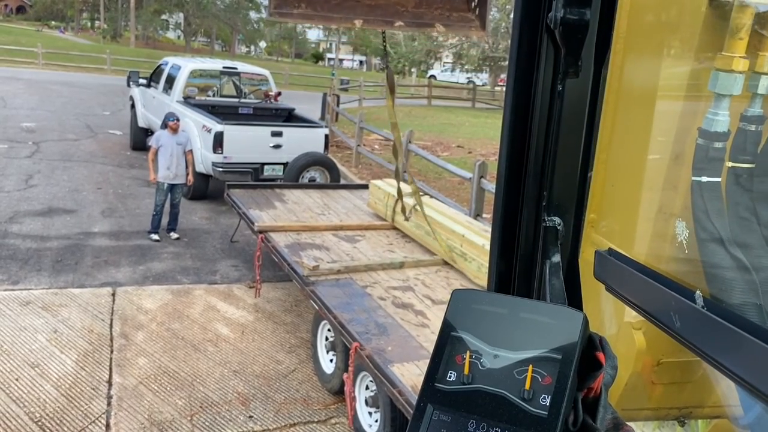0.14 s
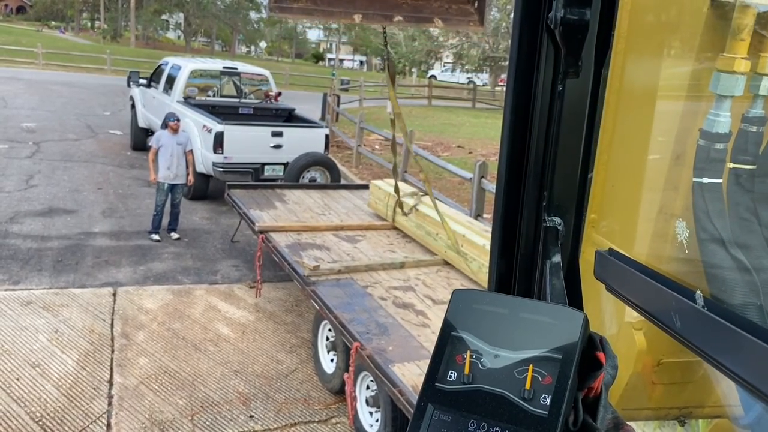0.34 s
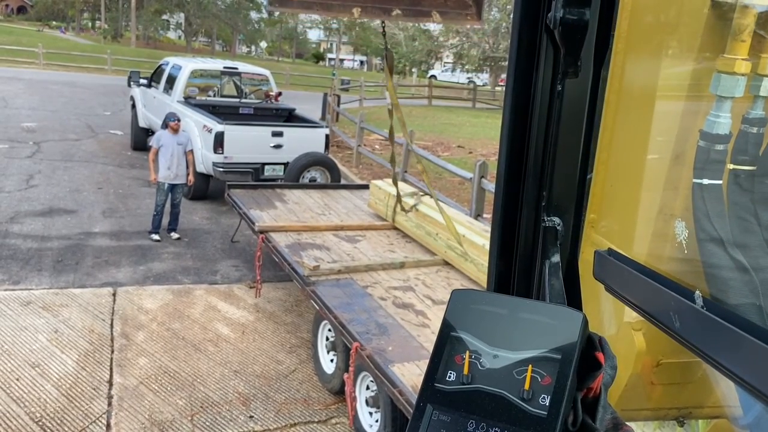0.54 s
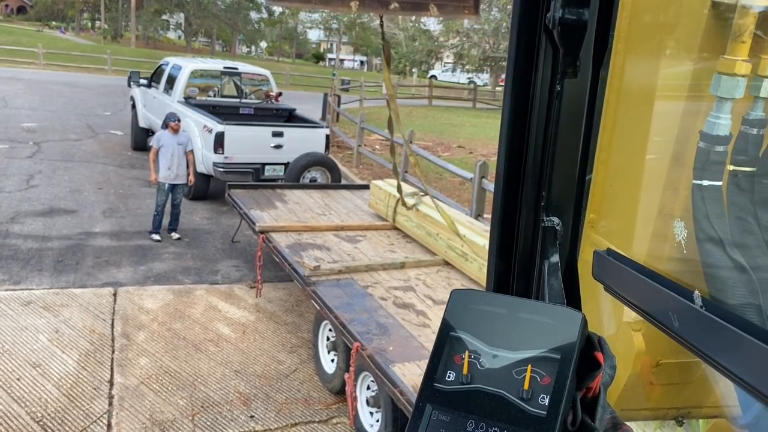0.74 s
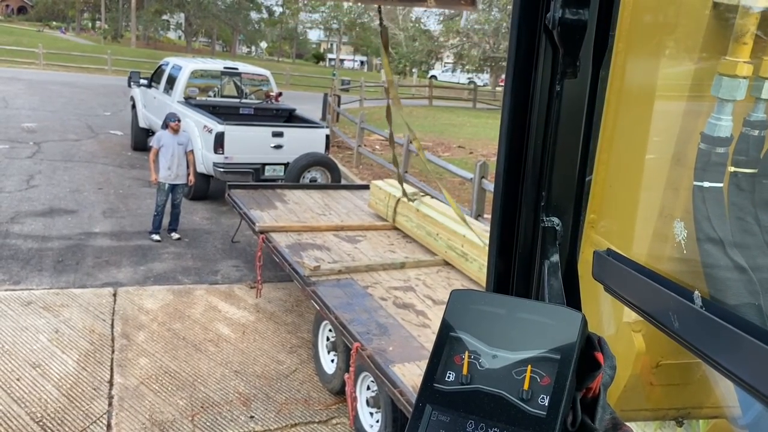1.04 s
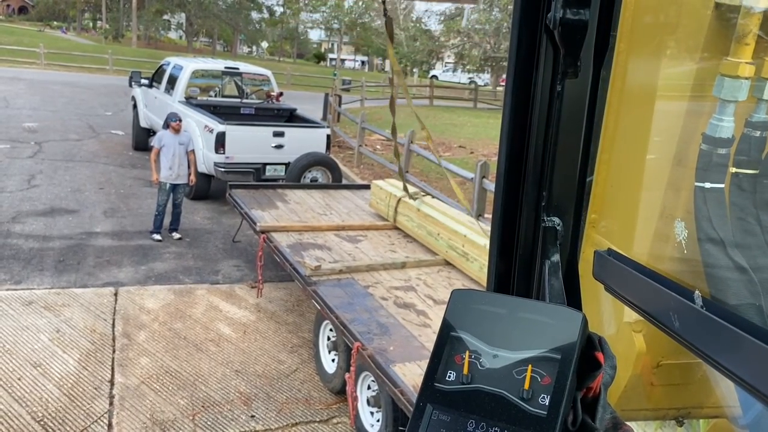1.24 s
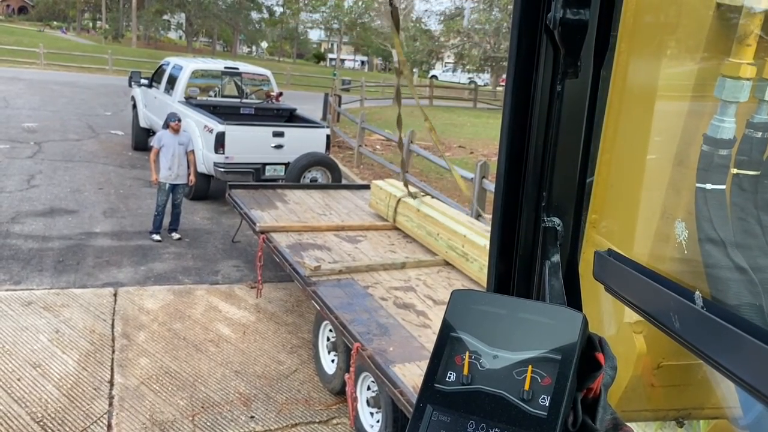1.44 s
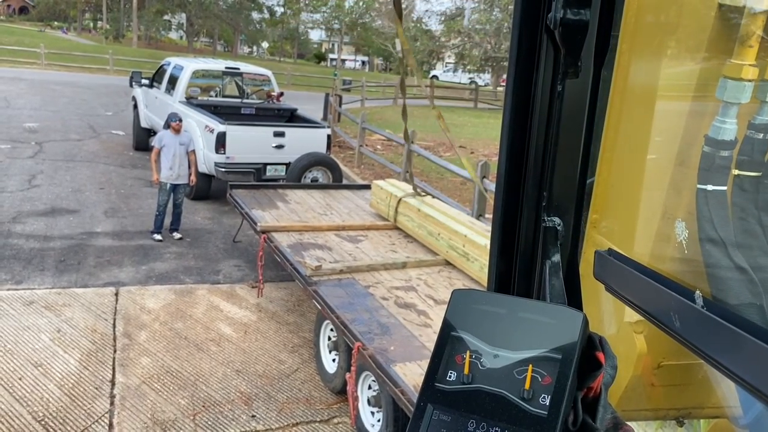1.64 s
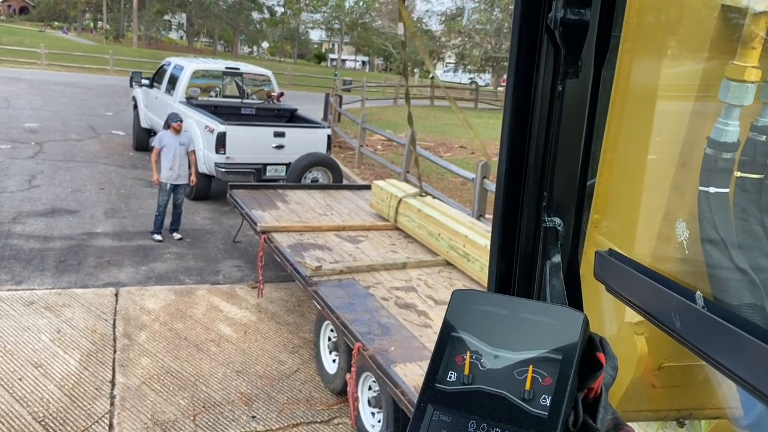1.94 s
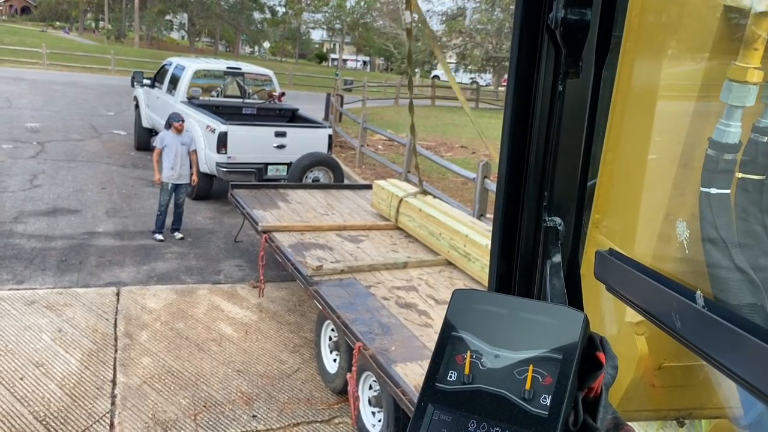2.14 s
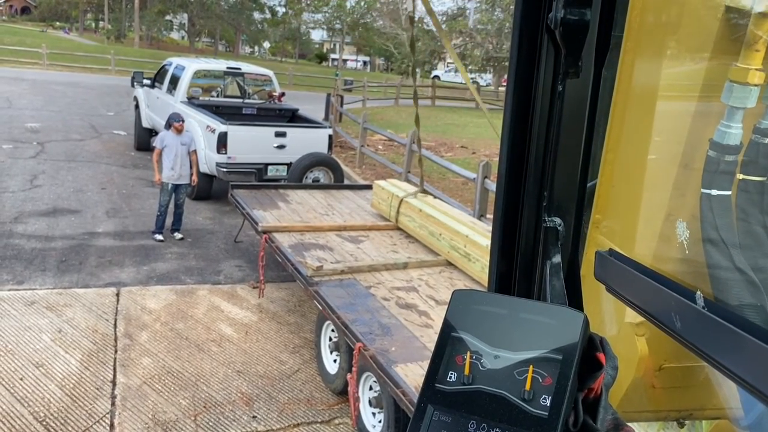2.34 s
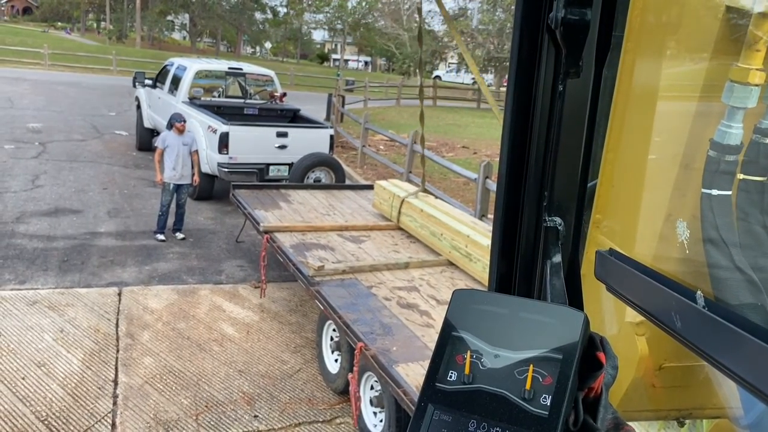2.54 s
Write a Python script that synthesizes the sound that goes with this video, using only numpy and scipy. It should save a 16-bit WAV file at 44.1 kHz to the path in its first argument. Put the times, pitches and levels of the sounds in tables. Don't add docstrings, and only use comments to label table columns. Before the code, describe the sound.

Constant deep diesel engine hum fills an excavator cab beside an outdoor driveway; pump and fan tones blend over broadband roar and soft hiss, while a few tiny metal ticks come later, captured on a handheld phone.

```python
import sys
import numpy as np
from scipy import signal
from scipy.fft import rfft, irfft
from scipy.io import wavfile
from scipy.ndimage import uniform_filter1d

SR = 44100
rng = np.random.default_rng(int(sys.argv[2]) if len(sys.argv) > 2 else 0)


def transcribe(u):
    v = np.clip(np.atleast_2d(u).T, -1, 1)
    q = np.round(v * 32767).astype(np.int16)
    wavfile.write(sys.argv[1], SR, q)


def invert_db(level):
    return 10 ** (np.asarray(level, dtype=float) / 20)


N = 119070


def level(x, db):
    return x * invert_db(db) / np.sqrt(np.mean(x ** 2))


def curve(table):
    times, values = np.array(table, float).T
    return np.interp(np.arange(N) / SR, times, values)


def walk(rate_hz):
    hold = int(SR / rate_hz)
    steps = np.repeat(rng.standard_normal(N // hold + 1), hold)
    return uniform_filter1d(uniform_filter1d(steps, hold), hold)[:N]


def colour(x, table):
    hz, db = np.array(table, float).T
    bins = np.arange(N // 2 + 1) * SR / N + 1e-3
    gain = invert_db(np.interp(np.log(bins), np.log(hz), db))
    return irfft(rfft(x) * gain, N)


def ring(x, hz, width_hz):
    b, a = signal.iirpeak(hz, hz / width_hz, fs=SR)
    return signal.lfilter(b, a, signal.lfilter(b, a, x))


def tones(turns, orders, table, wobble_db, wobble_rad):
    out = 0
    for order, (left, right, lead) in zip(orders, table):
        phase = 2 * np.pi * (order * turns + rng.random()) + wobble_rad * walk(8)
        gain = np.sqrt(2) * invert_db(wobble_db * walk(9.7))
        pair = np.array([invert_db(left) * np.sin(phase + lead), invert_db(right) * np.sin(phase)])
        out = out + gain * pair
    return out


def ports(x):
    lag_s, alike_hz = .000265, 10250
    hz = np.arange(N // 2 + 1) * SR / N
    delay = np.exp(-2j * np.pi * (hz - alike_hz) * lag_s)
    return np.array([irfft(rfft(x) * delay, N), x])


# f/Hz, level/dB
HISS_SPECTRUM = [(1500, -17), (4000, -2.5), (6500, 0), (8700, 0.5), (10500, -6), (13000, -9.5),
                 (15500, -8.5), (20000, -12)]


def hiss():
    drift_db = 0.4 * walk(3) + 0.41 * walk(6.7)
    return level(colour(rng.standard_normal(N), HISS_SPECTRUM), -58) * invert_db(drift_db)


# f/Hz, level/dB per Hz
ROAR_SPECTRUM = [(40, -6), (150, -2.5), (400, -10.5), (1300, -22), (2400, -30), (4500, -34), (7500, -46.5),
                 (11000, -68)]


def roar(turns):
    a = colour(rng.standard_normal(N), ROAR_SPECTRUM)
    b = colour(rng.standard_normal(N), ROAR_SPECTRUM)
    treble_db = 0.66 * 3
    left = colour(a, [(500, 0.0027), (4500, treble_db), (20000, treble_db)])
    pair = level(np.array([left, 0.24 * a + b]), -34.5)
    cycle_db = .5 * np.sin(2 * np.pi * turns)
    drift_db = 0.4 * walk(1.7) + .6 * walk(8.6) + 1.2 * walk(400)
    return pair * invert_db(cycle_db + drift_db)


# f/Hz, width/Hz, left level/dB, right level/dB
CAB_MODES = [(18, 12, -48.5, -47), (61.6, 6.7, -37.5, -36), (78.2, 17, -30.5, -29.5),
             (98.3, 22, -30, -29.5), (168, 47, -37, -30), (243.5, 16, -54, -53.5), (347.7, 28, -45.5, -45),
             (464, 120, -52.5, -48.5), (592, 30, -57.5, -54), (694.7, 30, -54.5, -48.5)]


def cab():
    out = 0
    for hz, width, left, right in CAB_MODES:
        mode = level(ring(rng.standard_normal(N), hz, width), 0)
        out = out + np.array([invert_db(left) * mode, invert_db(right) * mode])
    return out


# f/Hz, width/Hz, level/dB
PANEL_MODES = [(819.5, 40, -53), (1006, 48, -58.5), (1329, 48, -56.5), (1530, 23, -65), (2794, 50, -63),
               (3096, 320, -61.5), (3394, 250, -64.5), (4330, 220, -68)]


def panels():
    out = 0
    for hz, width, db in PANEL_MODES:
        pair = level(ring(rng.standard_normal((2, N)), hz, width), db)
        out = out + pair * invert_db(1.5 * walk(6.8))
    return out


# t/s, peak level/dB, length/s
RATTLE_EVENTS = [(0.666, -53.5, .008), (.873, -55.5, .008), (1.393, -46, .012), (1.769, -50.5, 0.0094),
                 (1.791, -55.5, 0.0087), (1.9465, -49, .004), (1.9955, -34, .011), (2.364, -53, .015),
                 (2.441, -56, .012), (2.478, -54.5, 0.011), (2.559, -48, .012), (2.587, -52, .012)]
# f/Hz, level/dB
RATTLE_SPECTRUM = [(2500, -24), (4500, -12), (6500, -8), (7600, -4), (9500, 0), (11000, -2), (14000, -4),
                   (20000, -12)]
# f/Hz, level/dB, t60/s
BUCKLE_MODES = [(4100, -8, .06), (5100, -10, .05), (5500, -10, .05), (7500, -13, .03), (10400, -15, .02)]


def rattles():
    snap_db, snap_s = 2, .0008
    tail_per_hold = 8.1
    t, env = np.arange(N) / SR, np.zeros(N)
    for start, db, hold in RATTLE_EVENTS:
        after = np.clip(t - start, 0, 1)
        snap = snap_db * np.exp(-after / snap_s)
        decay = 60 * np.clip(after - hold, 0, 1) / (tail_per_hold * hold)
        env += (t >= start) * invert_db(db + snap - decay)
    env *= invert_db(-6.5 + 1.5 * walk(820))
    out = env * level(colour(rng.standard_normal(N), RATTLE_SPECTRUM), 0)
    ticks = env * rng.standard_normal(N)
    for hz, db, t60 in BUCKLE_MODES:
        pole = np.exp(2j * np.pi * hz / SR - np.log(1000) / (t60 * SR))
        unit_gain = np.sqrt(2 - 2 * abs(pole) ** 2)
        out += invert_db(db) * unit_gain * signal.lfilter([1], [1, -pole], ticks).imag
    return out


# t/s, level/dB
PUMP_LOAD_CURVE = [
    (0, 0.5),
    (.5, 0),
    (.9, -2),
    (1.1, -1),
    (1.3, 0),
    (1.6, -3.5),
    (2.0, 0),
    (2.3, 2),
    (2.6, 3.5),
]
# left level/dB, right level/dB, left lead/rad
PUMP_LEVELS = [(-39.5, -38, -1.53), (-35, -37, 0.79), (-54, -48, 2.3), (-59.5, -56.5, -1.6),
               (-62.5, -61.5, -1), (-66, -64.5, -1.6)]


def pump(turns):
    ripple = tones(turns, [18, 36, 54, 90, 144, 162], PUMP_LEVELS, 1.6, .3)
    return ripple * invert_db(curve(PUMP_LOAD_CURVE))


# left level/dB, right level/dB, left lead/rad
ROTOR_LEVELS = [(-53, -51.5, -0.081), (-53, -48, .3), (-61, -56.5, 0)]


def rotor(turns):
    blades = turns * 12.955
    blade_tone = tones(blades, [1], [(-22.5, -16.7, -.4)], .35, .05)
    return blade_tone + tones(blades, [2, 3, 4], ROTOR_LEVELS, 1.1, 0.32)


# t/s, cycle rate f/Hz
CYCLE_RATE = [
    (0.15, 13.096),
    (0.45, 13.069),
    (0.75, 13.093),
    (1.05, 13.094),
    (1.35, 13.082),
    (1.65, 13.054),
    (1.95, 13.052),
    (2.25, 13.067),
    (2.55, 13.141),
]


def crankshaft():
    return np.cumsum(curve(CYCLE_RATE)) / SR


FIRING_MULTIPLES = [8, 12, 14, 17, 19, 24, 26.5, 40, 44, 53, 101, 166, 232, 244]
# left level/dB, right level/dB, left lead/rad
FIRING_LEVELS = [(-39.5, -32, -0.92), (-40.5, -31, 0), (-38.5, -34.5, 0.46), (-50.5, -53.5, -0.87),
                 (-58.5, -55, -.2), (-58.5, -59, 1), (-52.5, -50.5, 0.68), (-60.5, -57, 0.81),
                 (-56.5, -59, -.3), (-58.5, -47.5, 1), (-65, -60, -.4), (-67.5, -69, 0.61), (-71, -69.5, 0),
                 (-69.5, -72, -0.077)]


def engine(turns):
    drone = tones(turns, [4], [(-14.6, -12.9, -.1)], .15, .02)
    return drone + tones(turns, FIRING_MULTIPLES, FIRING_LEVELS, 0.5, 0.35)


def scene():
    turns = crankshaft()
    background = roar(turns) + cab() + panels() + ports(hiss() + rattles())
    return background + pump(turns) + rotor(turns) + engine(turns)


def roll_off(x):
    return signal.sosfilt(signal.butter(12, 15780, fs=SR, output="sos"), x)


def record(dry):
    mix = dry + .001
    return roll_off(mix)


dry = scene()
out = record(dry)
transcribe(out)
```